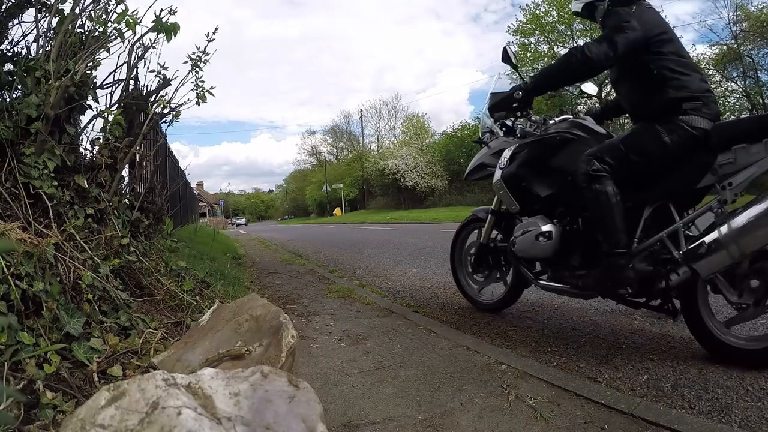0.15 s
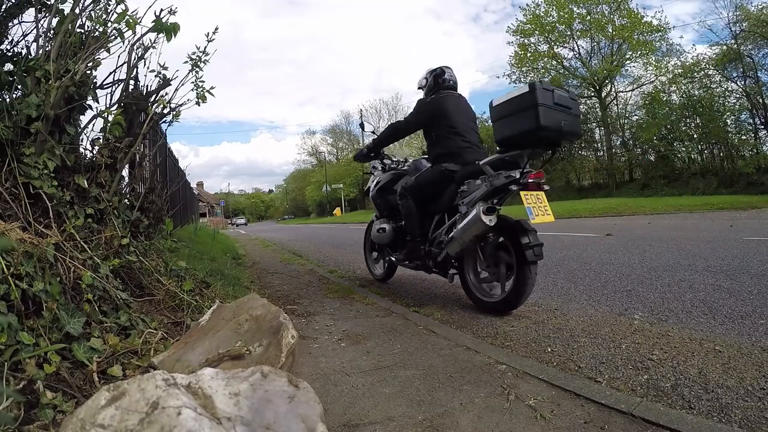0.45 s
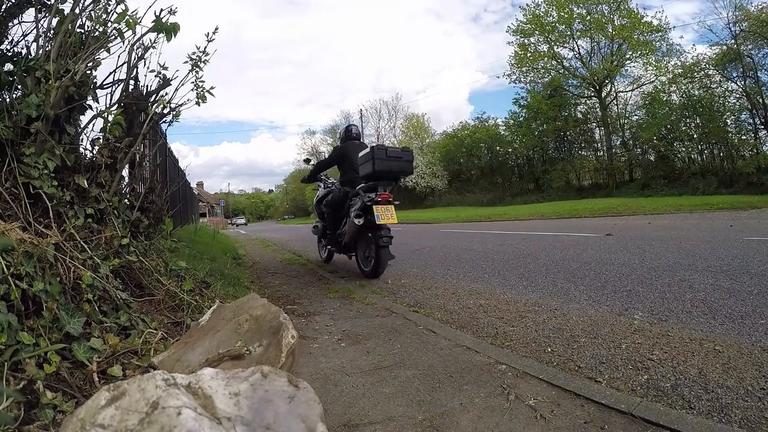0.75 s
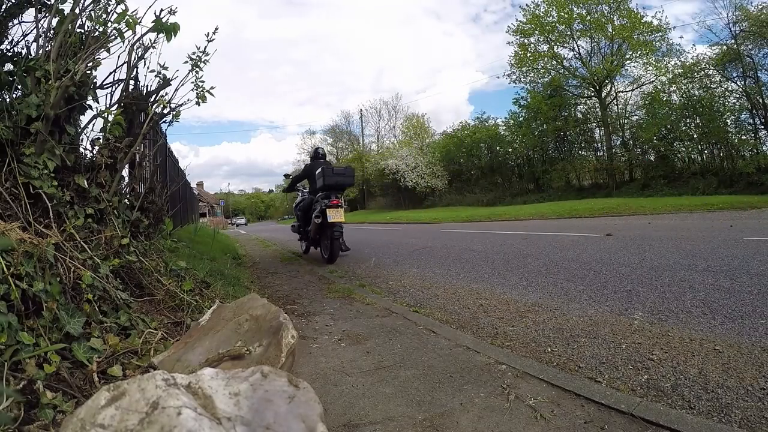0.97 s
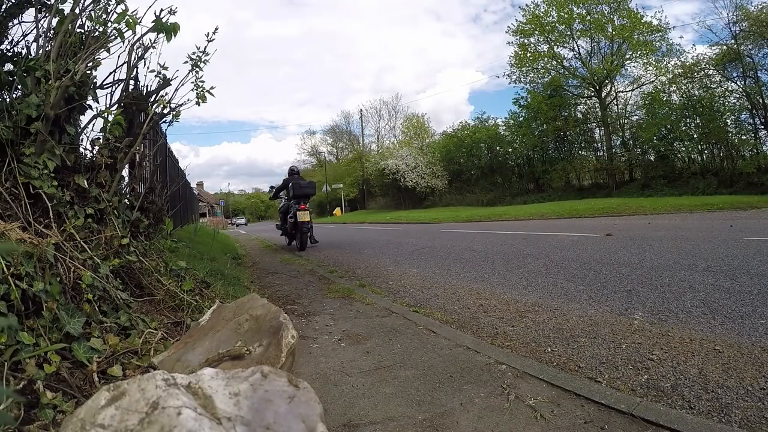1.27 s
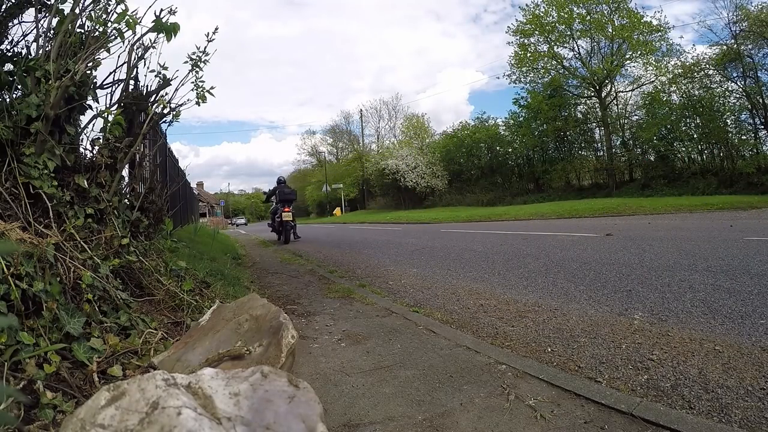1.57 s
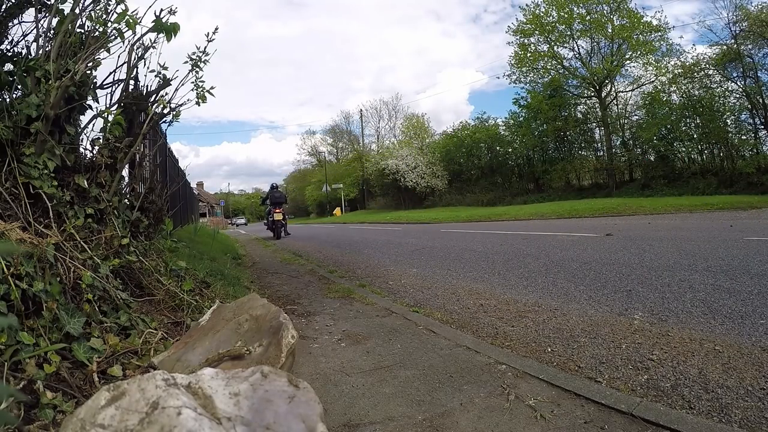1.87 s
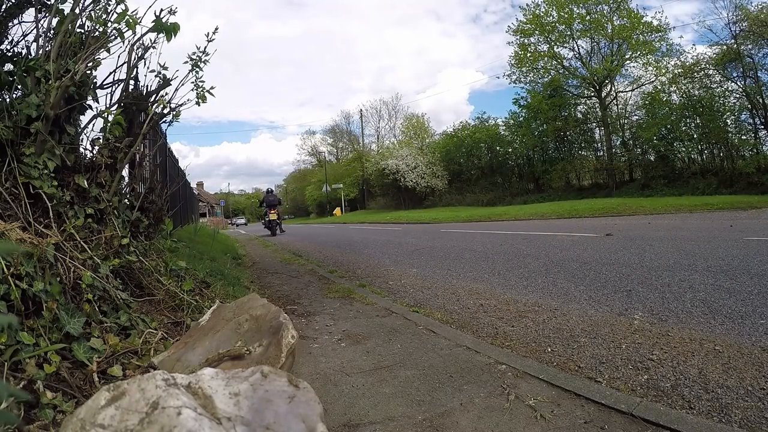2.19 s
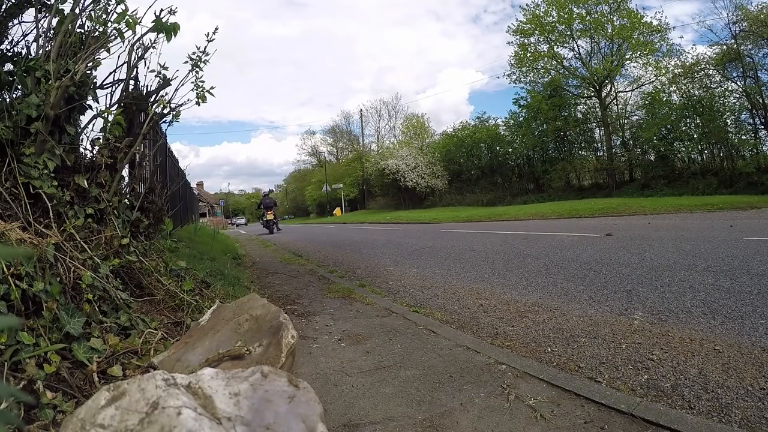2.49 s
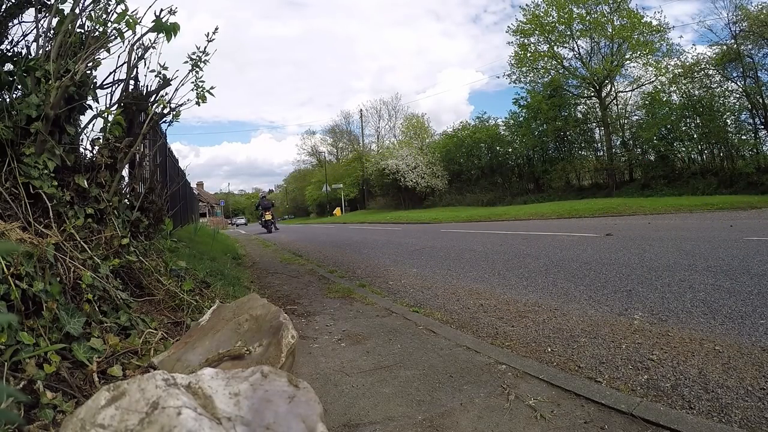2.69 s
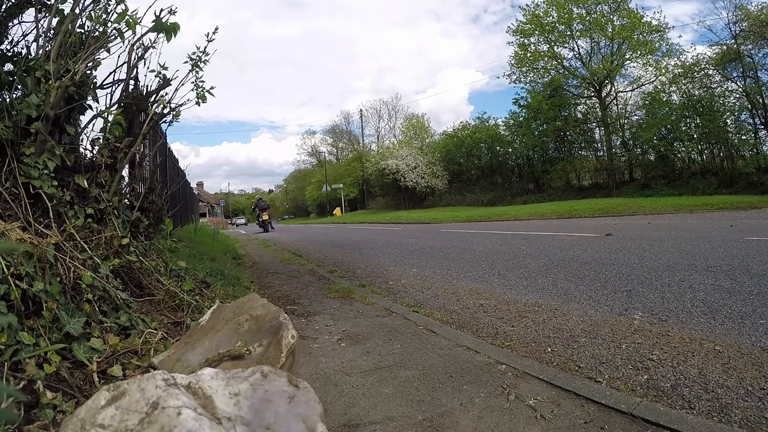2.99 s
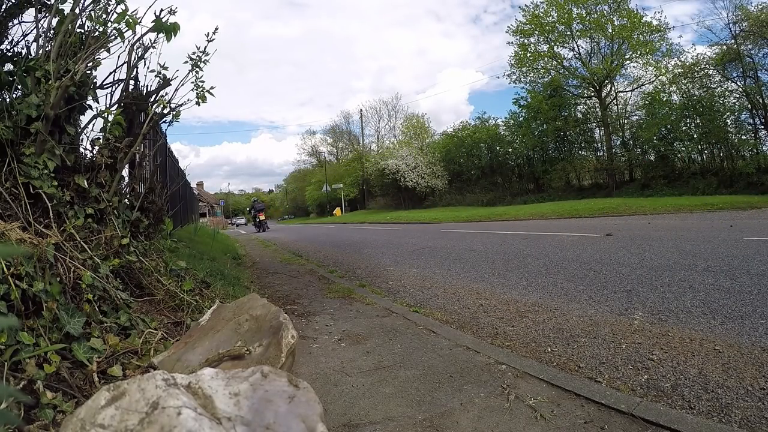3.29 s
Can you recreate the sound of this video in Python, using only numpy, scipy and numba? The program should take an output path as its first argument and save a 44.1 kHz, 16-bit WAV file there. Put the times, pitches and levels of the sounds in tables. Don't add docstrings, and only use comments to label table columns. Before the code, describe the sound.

A big twin motorcycle, loudest at the start, passes close with deep even exhaust thumps and dipping pitch, pulls briefly, then shuts off and recedes as a low lumpy idle; open roadside, small fixed camera microphone.

```python
import sys
import numpy as np
from scipy import signal
from scipy.io import wavfile
from scipy.ndimage import uniform_filter1d
from numba import njit

SR = 44100
rng = np.random.default_rng(int(sys.argv[2]) if len(sys.argv) > 2 else 0)


def volts(x):
    e = np.asarray(x, float) / 20
    return 10 ** e


def digitize_waveform(pressure):
    field = np.atleast_2d(pressure).T
    bounded = np.clip(field, -1, 1)
    quanta = np.round(bounded * 32767).astype(np.int16)
    wavfile.write(sys.argv[1], SR, quanta)


N = 152145

# (time [s], firing rate [Hz])
SPEED = [(0, 39.04), (.17, 37.41), (.3, 34.68), (.4, 32.63), (.48, 32.22), (.56, 33.34), (.66, 35.58),
         (.79, 38.03), (.93, 40.63), (1.0, 39.3), (1.1, 33.66), (1.25, 31.24), (1.4, 26.98), (1.6, 23.14),
         (1.8, 20.17), (1.86, 18.72), (3.45, 18.78)]
# (time [s], throttle [dB], pumping [dB], nearness [dB])
RIDE = [(0, -13.5, -20, -38), (.2, -15, -56, -38.5), (.5, -14.5, -48, -43), (.75, -15.5, -67, -46.5),
        (.92, -17, -19, -49.5), (1.0, -43, -16.5, -50.5), (1.2, -29, -20.5, -55.5),
        (1.4, -26.5, -22, -57.5), (1.6, -28.5, -26.5, -58.5), (1.85, -38.5, -22.5, -56.5),
        (2.1, -36, -20.5, -56), (2.35, -33, -20.5, -56.5), (2.6, -47, -27, -57), (2.85, -37, -27.5, -59),
        (2.97, -34, -25.5, -59), (3.15, -38.5, -27, -61), (3.45, -36, -25.5, -60)]
FIRST_TURN, RASP_LAG, GAS_LAG = .386, -0.019, -0.16

# (centre [Hz], width [Hz], level [dB])
PIPE = [(67, 58.5, 3.5), (107.3, 46.8, 7.5), (147.7, 81, -8), (227.8, 48.7, -15.5), (328, 220, -42.5),
        (37.3, 53, -8.5)]
# (time [s], peak [dB])
POPS = [(1.169, -15), (1.209, -15), (1.416, -16), (1.48, -26), (1.863, -12.5), (1.965, -10), (2.037, -11),
        (2.13, -11), (2.18, -9.5), (2.275, -10.5), (2.314, -10), (2.341, -9.5), (2.368, -11.5),
        (2.413, -15), (2.502, -9.5), (2.555, -9), (2.607, -11), (2.721, -12), (2.77, -14), (2.877, -15),
        (2.935, -16), (2.982, -11), (3.092, -23.5), (3.145, -14), (3.203, -14), (3.25, -14.5),
        (3.354, -9.5)]
AFTER_S, AFTER_DB = 0.02695, -7.5
# (centre [Hz], width [Hz], level [dB])
CAN = [(411, 99, -6), (514, 77, 3), (608, 98, -1.5), (925, 70, -10), (240, 170, -3.5), (2300, 700, -31),
       (738, 69, -7.5)]
CAN_DB, CAN_FADE, SHELL_NOISE = 9.5, 3.07, .006
CAN_TUNED_HZ, REAR_TUNED_HZ, TAIL_TUNED_HZ, FOLLOW = 37.64, 34.73, 38.6, 0.85

PUMP_LAG, PUSH_JITTER = .65, 0.05
PUSH_HZ, PUSH_CUT_HZ, IDLE_SCATTER_DB = 71.8, 21, 2.5
# (time [s], span [s], level [dB])
HEAVE = [
    (1.919, 0.031, -17.5),
    (2.35, 0.03, -14),
    (2.57, 0.061, -21),
    (2.962, 0.058, -15.5),
    (3.42, 0.081, -30),
]

# (frequency [Hz], density [dB per Hz])
RASP = [(150, -48), (250, 5.5), (352, -17), (542, -4), (689, -17), (938, -3.5), (1490, -18), (5320, -21),
        (15200, -40)]
RASP_DB, RASP_FLICKER_DB, RASP_SCATTER_DB = 2, 1.5, 2.5
GATE_SHARE, GATE_CYCLE = 0.35, 0.78
BARK_DB, BARK_HZ, BARK_CYCLE, BARK_SCATTER_DB = -3, 1300, 0.17, 2

# (centre [Hz], width [Hz], level [dB])
REAR = [(603, 81, 23), (298, 140, -25), (1100, 99, -16)]
REAR_S, REAR_SPAN_S, REAR_DB = 0.42, 0.28, -39
# (centre [Hz], width [Hz], level [dB])
TAIL = [(233, 49, 6), (294, 80, 0), (364, 130, -4)]
TAIL_S, TAIL_SPAN_S, TAIL_DB = 0.78, 0.12, -38
INTAKE_SPAN_S, INTAKE_DB = 0.15, 4.5
# (multiple of firing rate, time [s], span [s], level [dB])
WHINE = [
    (12.9, 0.848, 0.066, -43),
    (25, 0.28, 0.087, -45),
    (14, 0.067, 0.18, -38),
]
WHINE_WOBBLE = .45

RUSH_DB, RUSH_HZ, RUSH_FADE = -11.5, 9500, 2.4

# (frequency [Hz], density [dB per Hz])
AIR = [(120, -30), (200, -5.5), (351, -13), (637, -22.5), (1160, -24), (2430, -26), (4350, -36),
       (11800, -46.5), (15200, -55)]
AIR_DB, AIR_FLICKER_DB, AIR_FOLLOW = -53, 1.3, 0.82
RUMBLE_DB, RUMBLE_HZ = -27, 70.5
BIRD_DB, BIRD_HZ = -75, 6920
# (time [s], span [s], pitch [Hz], level [dB])
CHIRP = (0.7, .006, 15050, -53)

# (time [s], peak [dB], pitch [Hz])
TICKS = [(.3495, -24.5, 1490), (.375, -22.5, 2250), (0.4628, -16, 1140), (0.726, -19.5, 1100),
         (0.5882, -29, 1500), (.647, -34, 1640), (.675, -36, 1400), (0.703, -38, 1300), (.756, -35, 2200),
         (.785, -33, 1810), (.836, -35, 2330), (0.9905, -31, 1920), (1.013, -39, 1920), (1.041, -32, 1860),
         (1.0683, -36, 1950), (1.0964, -37.5, 1900), (1.12, -36, 2000), (1.248, -33, 1790),
         (1.2812, -25, 1450), (1.5224, -34.5, 1800), (1.3924, -41, 1630), (1.709, -39, 2700),
         (1.7857, -39, 1830), (1.847, -39, 1910), (1.855, -44, 3700), (1.9304, -32, 1850),
         (2.0585, -33, 2370), (2.1104, -38, 2880), (2.115, -31.5, 970), (2.142, -39, 2030),
         (2.186, -40, 1900), (2.214, -41, 2010), (2.306, -36, 2178), (2.33, -39.5, 2000),
         (2.4, -37.5, 1410), (2.5332, -40, 2020), (2.594, -38, 2340), (2.683, -43, 1770),
         (3.3646, -51, 2500)]
# (time [s], peak [dB], centre [Hz], decay [s])
CRACKS = [
    (0.0005, -36, 9150, 0.00089),
    (0.427, -26, 3170, 0.0068),
    (0.464, -30, 5000, 0.0034),
    (0.612, -27.5, 5540, 0.008),
    (0.825, -36.5, 9000, .006),
    (0.859, -40, 9500, .004),
    (1.769, -48, 8000, 0.0022),
    (1.972, -44.5, 13100, 0.0028),
]

# (multiple of firing rate, level [dB])
COAST = [(4, -47), (5, -45), (6, -52), (7, -52.5), (8, -46), (9, -52.5)]
COAST_S, COAST_SPAN_S = 1.08, 0.38
ECHO_S, ECHO_DB = .016, -16
END_S = .006


@njit
def glide(x, hz, width):
    y, b, l = np.empty(len(x)), 0., 0.
    for i in range(len(x)):
        g, k = np.tan(np.pi * hz[i] / SR), width / hz[i]
        v = (b + g * (x[i] - l)) / (1 + g * (g + k))
        b, l, y[i] = 2 * v - b, l + 2 * g * v, k * v
    return y


def svf(x, hz, width):
    return glide(x, np.full(len(x), float(hz)), float(width))


def unit(x):
    return x / np.sqrt(np.mean(x ** 2))


def noise():
    return rng.standard_normal(N)


def curve(table, order):
    return np.interp(np.arange(N) / SR, np.array(table)[:, 0], np.array(table)[:, order])


def nearness(fade=1):
    near = curve(RIDE, order=3)
    return near[0] + fade * (near - near[0])


def bell(at_s, span_s):
    return np.exp(-((np.arange(N) / SR - at_s) / span_s) ** 2)


def walk(rate):
    k = int(SR / rate)
    held = np.repeat(rng.standard_normal(N // k + 1), k)
    return 1.3 * uniform_filter1d(uniform_filter1d(held, k), k)[:N]


def scatter(db):
    return volts(db * rng.standard_normal(1000))


def beats(turns, scatter_db, pattern_db=0.):
    whole = np.floor(turns).astype(int)
    size = scatter(scatter_db) * volts(pattern_db * (np.arange(1000) % 2))
    return np.diff(whole, prepend=whole[0]) * size[whole]


def colour(spectrum, flicker_db):
    out = 0
    pts = np.array(spectrum)
    for hz in 220 * 2 ** np.arange(0, 6.3, .4):
        band = svf(svf(noise(), hz, hz / 2.5), hz, hz / 2.5)
        level = np.interp(np.log(hz), np.log(pts[:, 0]), pts[:, 1])
        out = out + volts(level + flicker_db * walk(9.62)) * band
    return unit(out)


def ring(x, body, slide=None):
    slide = np.ones(len(x)) if slide is None else slide
    out = 0
    for k, (hz, width, db) in enumerate(body):
        once = glide(x + 1e-18, hz * slide, float(width))
        out = out + (-1) ** k * volts(db) * glide(once, hz * slide, float(width))
    return out


def running(x, body, slide=None):
    cycle = int(SR / SPEED[0][1])
    if slide is not None:
        slide = np.pad(slide, (2 * cycle, 0), mode="edge")
    return ring(np.concatenate([x[:cycle], x[:cycle], x]), body, slide)[2 * cycle:]


def sing(x, body, tuned_hz):
    return running(x, body, (np.maximum(curve(SPEED, order=1), 30) / tuned_hz) ** FOLLOW)


def exhaust(turns):
    pops = np.zeros(N)
    pops[(np.array(POPS)[:, 0] * SR).astype(int)] = volts(np.array(POPS)[:, 1])
    pops = uniform_filter1d(uniform_filter1d(pops, size=24), size=24)
    pops = pops + volts(AFTER_DB) * np.roll(pops, int(AFTER_S * SR))
    impulse = np.zeros(N)
    impulse[0] = 1
    pipe_peak = np.abs(ring(impulse, PIPE)).max()
    thump = unit(running(beats(turns, 1.0), PIPE)) * volts(curve(RIDE, order=1))
    thump = thump + volts(-1.0) * ring(pops, PIPE) / pipe_peak
    knocks = beats(turns + RASP_LAG, 0.83) + SHELL_NOISE * noise()
    shell = unit(sing(knocks, CAN, CAN_TUNED_HZ))
    return thump + shell * volts(CAN_DB + nearness(CAN_FADE))


def pumping(turns):
    beat = 2 * turns + PUMP_LAG
    steady = beats(beat, 1.0, -7.5)
    loose = beats(beat + PUSH_JITTER * walk(30), IDLE_SCATTER_DB, -0.41)
    idle = np.clip((np.arange(N) / SR - 1.35) / 0.59, 0, 1)
    clicks = unit(steady) * (1 - idle) + unit(loose) * idle
    bump = signal.sosfilt(signal.bessel(6, PUSH_HZ, fs=SR, output="sos", norm="mag"), clicks)
    push = signal.sosfilt(signal.butter(1, PUSH_CUT_HZ, "high", fs=SR, output="sos"), bump)
    push = push + ring(clicks, [(37.6, 40.0, -2.5)])
    push = push / np.sqrt(uniform_filter1d(push ** 2, SR // 2))
    flutter = ring(noise(), [(234, 103, 0)]) * np.exp(-(beat % 1) / 0.8)
    flutter = volts(-28) * unit(flutter)
    swell = sum(volts(db) * bell(s, span) for s, span, db in HEAVE)
    heave = swell * np.cos(2 * np.pi * (beat - .25))
    return (push + flutter) * volts(curve(RIDE, order=2)) + heave


def rasp(turns):
    phase = turns + GAS_LAG
    size = scatter(RASP_SCATTER_DB)[phase.astype(int)]
    share = np.clip(GATE_SHARE * (1 + (curve(RIDE, order=1) + 15) / 45), 0, 1)
    gate = 1 - share + share * 3 * size * np.exp(-(phase % 1) / GATE_CYCLE)
    return gate * colour(RASP, RASP_FLICKER_DB) * volts(RASP_DB + nearness())


def bark(turns):
    phase = turns + GAS_LAG
    puff = scatter(BARK_SCATTER_DB)[phase.astype(int)] * np.exp(-(phase % 1) / BARK_CYCLE)
    gas = unit(ring(puff * noise(), [(BARK_HZ, 1500, 0), (3500, 5000, -12)]))
    return gas * volts(BARK_DB + nearness() + 0.24 * (curve(RIDE, order=1) + 10))


def outlet(turns):
    mouth = unit(sing(beats(turns + RASP_LAG, 0.76), REAR, REAR_TUNED_HZ))
    mouth = mouth * volts(REAR_DB) * bell(REAR_S, REAR_SPAN_S)
    opening = bell(TAIL_S, TAIL_SPAN_S) + volts(INTAKE_DB) * bell(0, INTAKE_SPAN_S)
    tail = unit(sing(beats(turns + 0.117, 0.54), TAIL, TAIL_TUNED_HZ)) * volts(TAIL_DB) * opening
    whine = 0
    for k, s, span, db in WHINE:
        tone = np.sin(2 * np.pi * np.round(k) * turns + WHINE_WOBBLE * walk(37.5))
        whine = whine + volts(db) * bell(s, span) * tone
    return mouth + tail + whine


def rush():
    return unit(svf(noise(), RUSH_HZ, 9000)) * volts(RUSH_DB + nearness(RUSH_FADE) + 3.3 * walk(40))


def roadside():
    t = np.arange(N) / SR
    follow = AIR_FOLLOW * np.minimum(nearness() + 60, 6)
    air = colour(AIR, AIR_FLICKER_DB) * volts(AIR_DB + 0.56 * walk(1.0) + follow)
    rumble = unit(ring(noise(), [(RUMBLE_HZ, 90, 0), (26, 20, 7)]))
    rumble = rumble * volts(RUMBLE_DB - 3.5 + 2.2 * walk(3.1)) * np.clip((t - .95) / 0.1, .05, 1)
    song = np.clip(np.minimum(t - 3.1, 3.36 - t) / .03, 0, 1)
    bird = unit(svf(noise(), BIRD_HZ, 40)) * volts(BIRD_DB) * song
    at_s, span_s, hz, db = CHIRP
    chirp = volts(db) * bell(at_s, span_s) * np.sin(2 * np.pi * hz * t)
    insects = volts(-70.5) * unit(ring(noise(), [(4300, 350, -3.5), (12560, 2500, -15.5)]))
    return air + rumble + bird + chirp + insects


def ticks():
    out = np.zeros(N + 2000)
    t = np.arange(2000) / SR
    bursts = []
    for s, db, hz in TICKS:
        click = t * np.exp(-t / 0.00023) * np.sin(2 * np.pi * hz * t)
        scrape = rng.standard_normal(2000) * (1 - np.exp(-t / 0.00047)) * np.exp(-t / 0.0061)
        bursts.append((s, db, click + 0.00011 * ring(scrape, [(hz, hz * 0.53, 0)])))
    for s, db, hz, decay in CRACKS:
        bursts.append((s, db, svf(rng.standard_normal(2000) * np.exp(-t / decay), hz, 4900)))
    for s, db, burst in bursts:
        start = int(s * SR)
        out[start:start + 2000] += volts(db) * burst / np.abs(burst).max()
    return out[:N]


def coast(turns):
    lines = sum(volts(db) * np.sin(2 * np.pi * np.round(k) * turns) for k, db in COAST)
    return bell(COAST_S, COAST_SPAN_S) * lines


def scene():
    turns = np.cumsum(curve(SPEED, order=1)) / SR + FIRST_TURN
    bike = exhaust(turns) + pumping(turns) + rasp(turns) + bark(turns)
    bike = bike + outlet(turns) + rush() + ticks() + coast(turns)
    hedge = volts(ECHO_DB) * np.pad(bike, (int(ECHO_S * SR), 0), mode="reflect")[:N]
    return (bike + hedge + roadside())[None]


def low_pass(x):
    return signal.sosfilt(signal.butter(12, 15310, fs=SR, output="sos"), x)


def record(dry):
    left = np.clip((N - np.arange(N)) / (END_S * SR), 0, 1)
    mix = dry * np.sin(np.pi / 2 * left) ** 2
    return low_pass(mix)


dry = scene()
out = record(dry)
digitize_waveform(out)
```